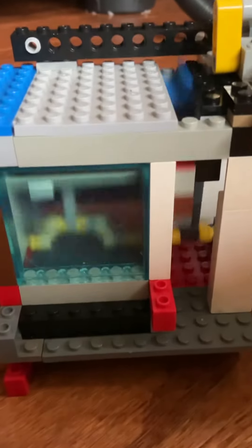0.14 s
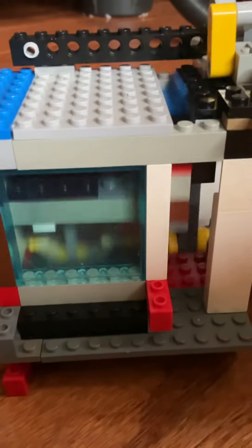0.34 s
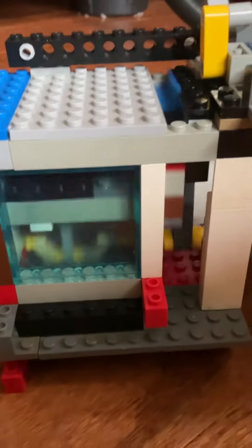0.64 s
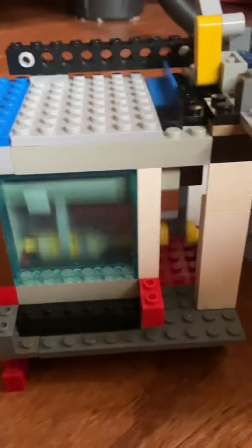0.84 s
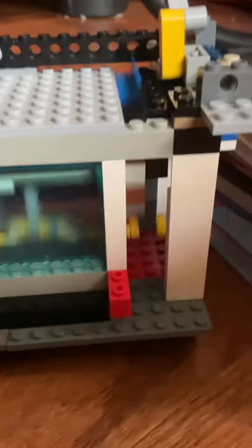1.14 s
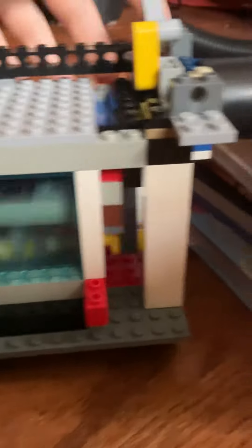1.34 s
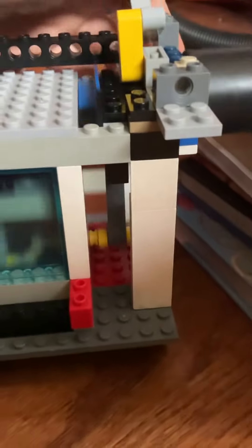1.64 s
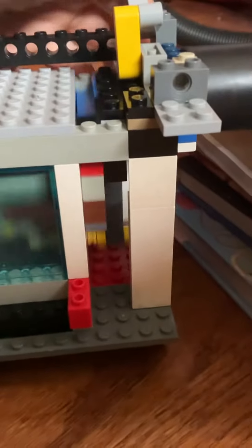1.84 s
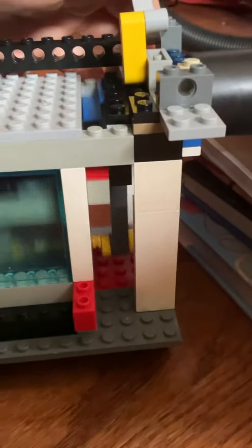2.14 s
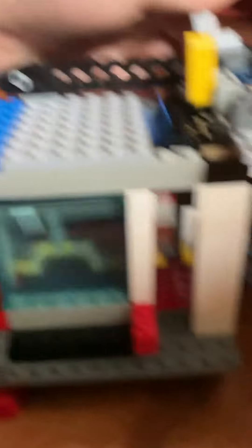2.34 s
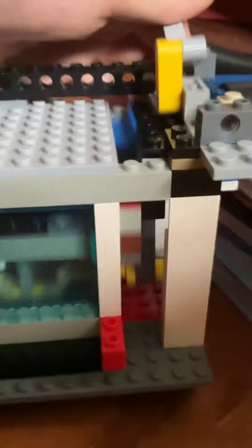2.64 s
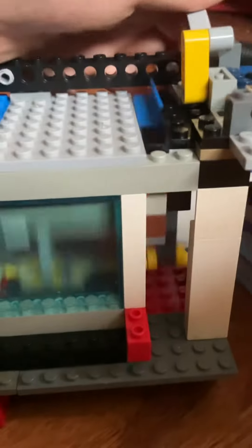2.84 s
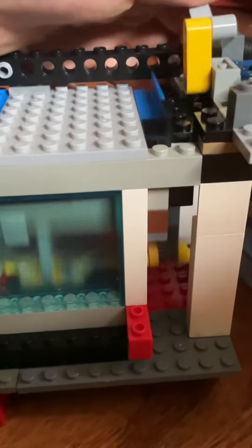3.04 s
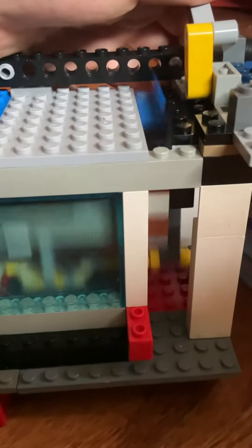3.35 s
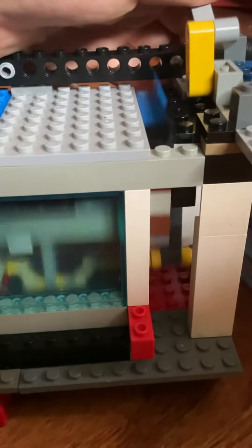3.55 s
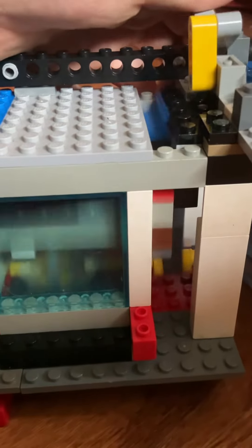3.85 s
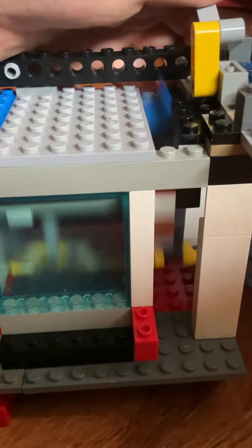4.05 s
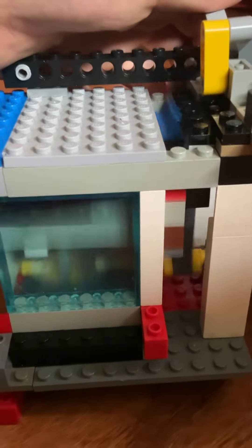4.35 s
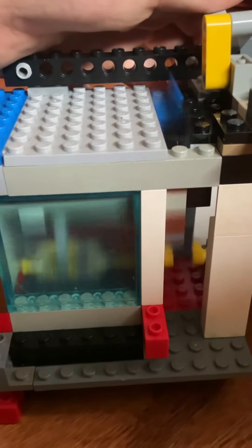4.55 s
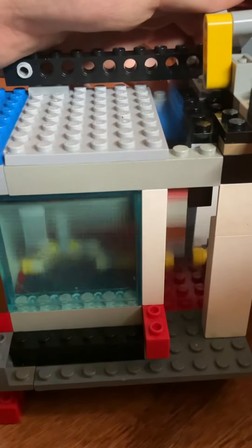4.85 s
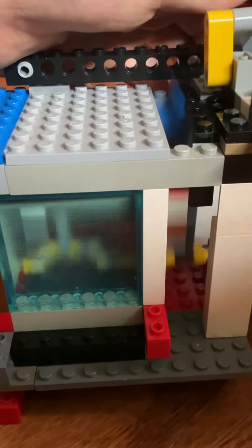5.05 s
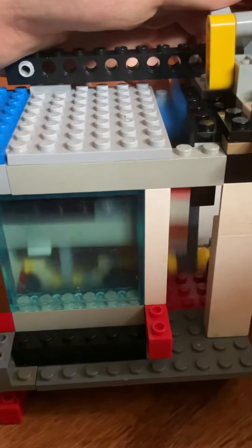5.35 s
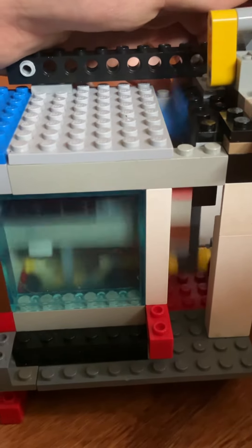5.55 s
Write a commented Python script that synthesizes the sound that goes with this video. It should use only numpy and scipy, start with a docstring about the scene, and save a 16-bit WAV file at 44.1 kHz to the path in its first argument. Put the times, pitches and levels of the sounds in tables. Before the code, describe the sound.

A vacuum cleaner runs from start to finish with a steady, airy roar, a low drone and a thin high whine. Its suction drives a toy plastic brick engine on a wooden table, close to the microphone in a small room. For the first 2 seconds the engine turns about seven times a second, each turn giving a hollow clack and lighter, brighter taps, with loose bricks rattling and faint thumps from the table. The hose gives high, wavering whistles in quick bursts, strongest in the first second or so, and leaking air hisses in time with the strokes. From about 2.5 to 4 seconds the clatter surges and sags three times, getting louder whenever it speeds up. From about 4.5 seconds it runs fast, reaching around sixteen turns a second by the end, near 5.7 seconds.

```python
"""On a wooden table, close to the microphone, a vacuum cleaner's suction drives a toy brick engine.
It speeds up unevenly from about 7 to 16 turns a second. The piston knocks at both ends of its stroke,
the table thumps and loose plastic bricks rattle. The valve chops the air, so the ribbed hose whistles
in bursts and leaks hiss in time, over the steady roar of the cleaner's motor."""
import sys
import numpy as np
from scipy import signal
from scipy.fft import rfft, next_fast_len
from scipy.io import wavfile
from scipy.ndimage import uniform_filter1d

SR = 44100
rng = np.random.default_rng(int(sys.argv[2]) if len(sys.argv) > 2 else 0)


def store_pcm(level_fs):
    """Save levels as 16-bit WAV."""
    pcm = np.round(np.clip(level_fs, -1, 1) * 32767).astype(np.int16)
    wavfile.write(sys.argv[1], SR, np.atleast_2d(pcm).T)


N = 250929
TIME = np.arange(N) / SR

# The four knocks of each turn: out stroke ends, valve flips, return stroke ends, valve flips back.
# position/turns, level/dB, rise/dB per doubling of speed, scatter/dB, treble boost/dB per octave
BLOWS = [(0, -17, 4.8, 1.3, 0), (.27, -24.5, 5, 1.8, 6), (.475, -22, 6, 1.8, 5), (.87, -27.5, 6, 2.2, 14)]


def undb(db):
    """Turn decibels into a number to multiply by."""
    return 10 ** (np.asarray(db) / 20)


def unit(x):
    """Scale a signal to an average (rms) size of 1."""
    return x / np.sqrt(np.mean(x ** 2))


def curves(table):
    """Join up a table's rows over time: one curve for each column after the first."""
    t, *columns = np.transpose(table)
    return [np.interp(TIME, t, c) for c in columns]


def colour(x, points):
    """Shape a signal's bass and treble by rows of f/Hz, level/dB; the result has size 1."""
    hz, db = np.transpose(points)
    size = next_fast_len(N)
    f = np.maximum(np.fft.rfftfreq(size, 1 / SR), 1)
    gain = undb(np.interp(np.log(f), np.log(hz), db))
    return unit(np.fft.irfft(rfft(x, size) * gain, size)[:N])


def noise(points):
    """The hiss of swirling air, shaped by rows of f/Hz, level/dB."""
    return colour(rng.standard_normal(N), points)


def wander(rate):
    """A smooth random drift of size 1, with about rate changes a second."""
    k = int(SR / rate)
    steps = np.repeat(rng.standard_normal(N // k + 1), k)
    return unit(uniform_filter1d(uniform_filter1d(steps, k), k)[:N])


def flutter(width_hz):
    """The wavering strength and phase of a note stirred by air, as complex numbers."""
    k = np.exp(-2 * np.pi * width_hz / SR)
    stirring = rng.standard_normal(N) + 1j * rng.standard_normal(N)
    waver = signal.lfilter([1], [1, -2 * k, k * k], stirring)
    return waver / np.std(waver)


def hollow(hz, width_hz):
    """The breathy note of air blowing through a hollow space."""
    return np.real(flutter(width_hz) * np.exp(2j * np.pi * hz * TIME))


def ring(modes, times, gains, tilt_db=0):
    """Strike an object so its notes (modes) ring and fade, a little differently each time."""
    hz, db, t60 = np.transpose(modes)[:, :, None]
    t = np.arange(SR // 10) / SR
    fade = np.exp(-np.log(1000) * t / t60)
    out = np.zeros(N + len(t))
    for start, gain in zip(times, gains):
        size, shift = rng.standard_normal((2, len(hz), 1))
        weight = undb(db + 3.5 * size + tilt_db * np.log2(hz / hz[0]))
        detune = 1 + .06 * shift
        blow = np.sum(weight * np.sin(2 * np.pi * hz * detune * t) * fade, axis=0)
        i = int(np.clip(start * SR, 0, N))
        out[i:i + len(t)] += gain * blow / np.sqrt(np.sum(weight ** 2))
    return out[:N]


def highpass(x, hz, order):
    """Cut the bass: a small object gives off little below its lowest note."""
    return signal.sosfilt(signal.butter(order, hz, "high", fs=SR, output="sos"), x)


def swing(turn, peak, count):
    """A swell between -1 and 1, count times a turn, highest at the crank position peak."""
    return np.cos(2 * np.pi * count * (turn - peak))


def stall(turn, at, depth):
    """A dip in the airflow twice a turn: at the given crank position and opposite it."""
    return 1 - depth * (.5 + .5 * swing(turn, at, count=2)) ** 2


def doublings(speed):
    """How many times the speed has doubled from 12 turns a second; negative when slower."""
    return np.log2(speed / 12)


def passes(turn, at):
    """The times when the crank goes through the given position."""
    return np.interp(np.arange(at, turn[-1], 1), turn, TIME)


def knocks(turn, speed):
    """Piston and valve hit the ends of their travel: one hollow clack and three brighter taps a turn."""
    # The brick frame's notes: f/Hz, relative level/dB, time to fade by 60 dB/s
    frame_modes = [(534, -20, 0.011), (687, 13, 0.015), (780, 1.5, 0.016), (910, 5, 0.017),
                   (1137, 10, 0.013), (1320, 1, 0.012), (1500, 8, 0.012), (1800, 3, 0.0094),
                   (2300, -14, .006)]
    out = 0
    for at, db, rise_db, scatter_db, tilt_db in BLOWS:
        times = passes(turn, at)
        pace = np.interp(times, TIME, doublings(speed))
        force = undb(db + rise_db * pace + scatter_db * rng.standard_normal(len(times)))
        out = out + ring(frame_modes, times, force, tilt_db)
    return highpass(out, hz=520, order=4)


def table_thumps(turn, speed):
    """The first two knocks of each turn rock the frame, which pushes on the table."""
    # The table top's notes: f/Hz, relative level/dB, time to fade by 60 dB/s
    wood_modes = [(66, -23, 0.054), (92, -1, 0.09), (114, 6.5, 0.077), (172, 1, 0.082)]
    lag_s = .0014
    pushes = np.concatenate([passes(turn, blow[0]) for blow in BLOWS[:2]])
    force = undb(1.7 * rng.standard_normal(len(pushes)))
    thumps = highpass(ring(wood_modes, pushes + lag_s, force), hz=65, order=6)
    return unit(thumps) * undb(-52.5 + 10.5 * doublings(speed))


def brick_rattle(turn, speed):
    """Loose bricks and axles chatter, most just after the clack and harder as the crank speeds up."""
    # The tone of the chattering plastic: f/Hz, relative level/dB
    rattle_tone = [(150, -23), (400, -14.5), (600, -6.5), (1050, 2), (1300, -5.5), (1550, 4), (2200, -12.5),
                   (4500, -8), (9000, -42)]
    ticks_per_s = 1100
    ticks = (rng.random(N) < ticks_per_s / SR) * rng.choice([-1, 1], N)
    force = undb(np.minimum(3 * rng.exponential(size=N), 11))
    chatter = highpass(colour(ticks * force, rattle_tone), hz=80, order=2)
    return chatter * undb(-33 + 5.5 * doublings(speed) + 1.9 * swing(turn, peak=.2, count=1))


def whistle(modes, flow, steadiness, bend_hz):
    """Air swirling off the ribs makes the hose sing; its notes go higher as the flow rises."""
    out = 0
    for hz, width_hz, db in modes:
        waver = flutter(width_hz)
        waver = waver / np.sqrt(1 + steadiness * np.abs(waver) ** 2)  # a note can only grow so loud
        tone = np.exp(2j * np.pi * np.cumsum(hz + bend_hz * flow) / SR)
        out = out + undb(db) * unit(np.real(waver * tone))
    return unit(out)


def hose(turn):
    """Air is drawn on both strokes and stalls between them, so the whistles come in bursts."""
    # The notes of the air in the hose, in three groups: f/Hz, width/Hz, relative level/dB
    upper_modes = [(2876, 22, -4), (2930, 40, -10), (2999, 19, 0), (3082, 34, -11)]
    middle_modes = [(2493, 32, -19.5), (2685, 14.6, -6.5)]
    lower_modes = [(1402, 12.4, -12), (1817, 28, -9.5), (2019, 32, -6), (2370, 18.4, -2.5)]
    # How loudly each group sings: t/s, upper level/dB, middle level/dB, lower level/dB
    whistle_levels = [(0, -22.5, -24.5, -30), (.2, -26, -24.5, -32), (.55, -23.5, -28, -29),
                      (.95, -24.5, -25.5, -32), (1.55, -29, -30, -31), (2.3, -27, -30.5, -33.5),
                      (2.95, -25.5, -33.5, -31.5), (3.9, -28, -31, -33.8), (4.6, -25.5, -32, -34),
                      (5.69, -27, -36, -37.5)]
    upper_db, middle_db, lower_db = (db + 1.1 * wander(9) for db in curves(whistle_levels))
    flow = swing(turn, peak=.36, count=2)
    upper = whistle(upper_modes, flow, steadiness=2, bend_hz=5) * stall(turn, at=.07, depth=.6)
    middle = whistle(middle_modes, flow, steadiness=1.4, bend_hz=5.8) * stall(turn, at=.0097, depth=.051)
    # the lower notes take over when the flow is weak
    lower = whistle(lower_modes, flow, steadiness=.11, bend_hz=4) * stall(turn, at=.25, depth=.34)
    return unit(upper) * undb(upper_db) + unit(middle) * undb(middle_db) + unit(lower) * undb(lower_db)


def valve(turn, speed):
    """Air rushes through the valve's hollow port on each stroke; gaps in the bricks hiss once a turn."""
    # The tone of the valve's rush, a broad leak and a thin jet: f/Hz, relative level/dB
    rush_tone = [(800, -32), (2000, -4), (3200, 2), (3900, -2.5), (4300, -2), (4750, 1), (5500, -7),
                 (7200, -10), (8000, -14), (9300, -20), (16000, -21)]
    leak_tone = [(3500, -32), (6800, -7), (7900, -19), (9400, -22), (10200, -9.5), (10850, -4),
                 (11300, -7.5), (12100, 0.5), (12600, -1.5), (13300, -1), (14750, 3.5), (15600, 1.5)]
    jet_tone = [(8500, -43), (12400, -23), (13200, -7), (13700, -3), (14150, -9), (14700, 0),
                (15200, -15.5)]
    # Air drawn in between the bricks: t/s, base leak level/dB, base jet level/dB
    gap_levels = [(0, -27.5, -32), (1.15, -27.5, -36), (1.5, -28, -32), (2.1, -29.5, -33),
                  (2.45, -28.5, -31.5), (3.45, -29, -31.5), (3.95, -29, -37), (5.69, -30, -38.5)]
    leak_db, jet_db = curves(gap_levels)
    slowness = np.clip((15 - speed) / 8, 0, 1)
    stroke_db = (2 - 1.5 * slowness) * swing(turn, peak=.56, count=2)
    rush = noise(rush_tone) * undb(-30 - .43 * slowness + stroke_db + 1.8 * wander(45))
    port = hollow(hz=4674, width_hz=160) * stall(turn, at=.17, depth=.63)
    port = unit(port) * undb(-39.5 + 4 * doublings(speed))
    pulse = np.tanh(2 * swing(turn, peak=.67, count=1))
    leak = noise(leak_tone) * undb(leak_db + (.3 + .61 * slowness) * pulse + .46 * wander(45))
    # above 9.2 turns a second the piston swallows the air and starves the jet
    starved_db = 1.7 * np.maximum(speed - 9.2, 0)
    jet = unit(noise(jet_tone) * undb(3.2 * pulse + .91 * wander(30.3)))
    return rush + port + leak + jet * undb(jet_db - starved_db)


def cleaner():
    """The fan roars, its case drones, the shaft whines; whine and exhaust fade when the toy blocks them."""
    # The motor and how openly it is heard: t/s, shaft speed/Hz, change in whine and exhaust level/dB
    motor_run = [(0, 626.6, 2), (1.1, 626.7, 1.5), (1.6, 626.7, -2), (2.4, 626.7, -2), (3, 626.5, -3),
                 (4.3, 626.3, -3), (4.7, 624.4, -1), (5.69, 624.5, -1)]
    # The tones of the whine: multiple of the shaft speed, base level/dB
    shaft_tones = [(1, -49), (7, -47), (12, -52), (14, -62), (24, -48)]
    # The hollow case's notes: f/Hz, width/Hz, level/dB
    case_modes = [(238.3, 15.2, -48.5), (267.6, 18, -54), (302.6, 19, -49.5)]
    # The tone of the fan and of the air it blows out: f/Hz, relative level/dB
    roar_tone = [(25, -62), (60, -34), (130, -13), (230, -10.5), (400, -4.5), (650, -5.5), (1100, -3),
                 (1700, -2), (2600, 5.5), (4600, -3.5), (5700, -9), (7400, -14.5), (9400, -23.5)]
    exhaust_tone = [(3000, -27), (4500, -4), (5200, -0.5), (5800, -4.5), (6500, 2), (7450, -2),
                    (7800, -12.5), (9400, -23), (12000, -28)]
    shaft_hz, exposure_db = curves(motor_run)
    angle = 2 * np.pi * np.cumsum(shaft_hz * (1 + .0002 * wander(12))) / SR
    whine = sum(undb(db + 2 * wander(9)) * unit(np.sin(k * angle)) for k, db in shaft_tones)
    drone = sum(undb(db) * unit(hollow(hz, width)) for hz, width, db in case_modes)
    roar = noise(roar_tone) * undb(-27.5 + .25 * wander(12))
    exhaust = noise(exhaust_tone) * undb(-36.5)
    return roar + drone + (whine + exhaust) * undb(exposure_db)


def room(x, fade_s, echo_db):
    """Add a short blur of echoes from the table and the walls."""
    t = np.arange(SR // 2) / SR
    tail = rng.standard_normal(len(t)) * np.exp(-np.log(1000) * t / fade_s) * (t > .004)
    return x + undb(echo_db) * signal.fftconvolve(x, tail / np.linalg.norm(tail))[:N]


def scene():
    """The crank's speed sets the force; its position times both the clatter and the air."""
    # The crank surges and sags as the valve catches the suction: t/s, speed/turns per s
    crank_speeds = [(0, 7.57), (0.73, 6.09), (0.9, 8.05), (1.15, 6.61), (1.81, 8.14), (2.03, 6.85),
                    (2.33, 9.09), (2.61, 8.73), (2.75, 12.84), (3.0, 8.88), (3.23, 15.04), (3.48, 8.43),
                    (3.79, 14.82), (4.09, 10.64), (4.49, 13.35), (5.16, 15.39), (5.35, 13.43), (5.5, 15.97),
                    (5.69, 15.9)]
    speed, = curves(crank_speeds)
    turn = -.03 + np.cumsum(speed) / SR  # position in turns; each whole number ends an out stroke
    clatter = knocks(turn, speed) + table_thumps(turn, speed) + brick_rattle(turn, speed)
    mono = room(clatter, fade_s=.25, echo_db=-15) + hose(turn) + valve(turn, speed) + cleaner()
    return np.array([mono, mono])


def record(dry):
    """The microphone cuts off the very highest treble steeply."""
    top_hz = 15750
    return signal.sosfilt(signal.ellip(12, .1, 90, top_hz, fs=SR, output="sos"), dry)


dry = scene()
out = record(dry)
store_pcm(out)
```